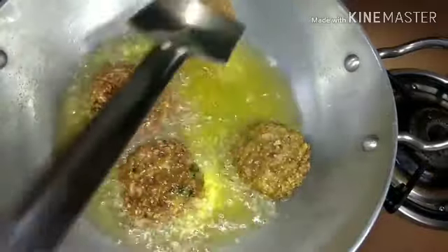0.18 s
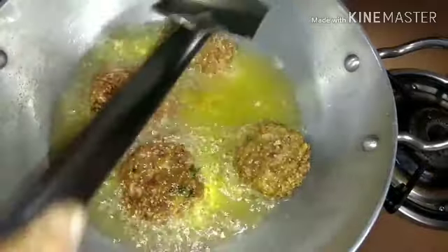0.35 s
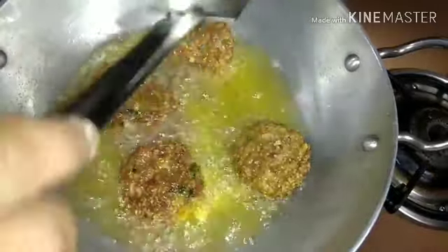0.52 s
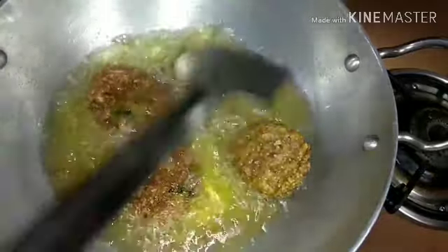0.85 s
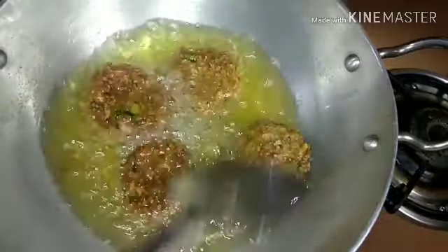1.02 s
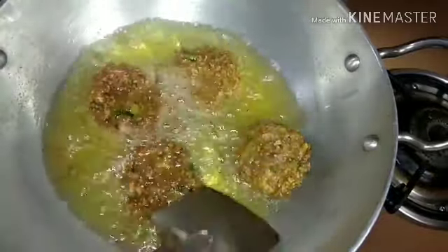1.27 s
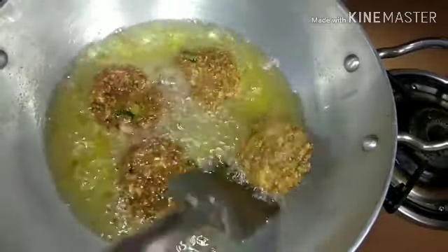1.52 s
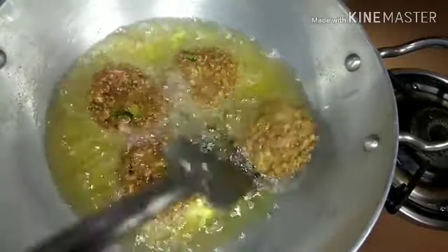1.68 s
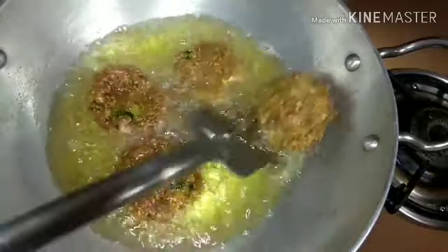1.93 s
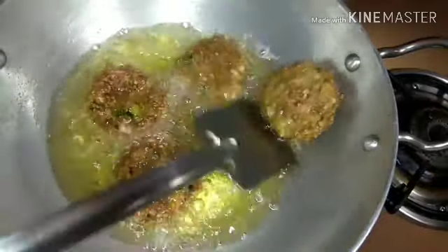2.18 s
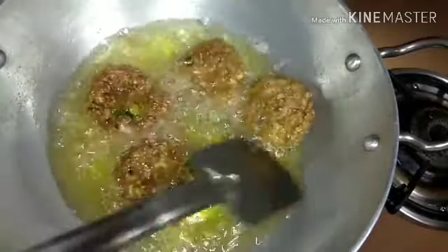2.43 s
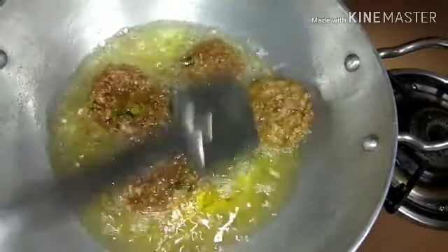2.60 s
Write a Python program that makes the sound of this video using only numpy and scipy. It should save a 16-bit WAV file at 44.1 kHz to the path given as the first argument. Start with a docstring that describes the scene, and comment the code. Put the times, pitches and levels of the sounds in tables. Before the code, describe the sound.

Frying in hot oil: crisp high crackles and tiny snaps scattered over a thin, bright, patchy fizz. A sharp pop stands out near 0.9 seconds. Pops come more steadily after 1, then crowd together from 2 to 2.4, loudest near 2.3. Low bubble plops and spatula drags are barely audible; a faint high metallic ting comes near 2.5. Close phone sound, short pan and kitchen echoes.

```python
"""Cutlets fry in a metal pan of hot oil under a phone. From the start, steam bubbles burst as short pitched
pops over a fizz of countless tiny bubbles, larger bubbles plop softly, and a spatula drags on the pan in
band-passed strokes of hum, with low bumps of the hand. The pops crowd together past two seconds, and near
the end the blade rings once as a decaying sine. Throughout, echoes in pan and kitchen give a short tail,
and a noise suppressor thins the steady fizz into patches."""
import sys
import numpy as np
from scipy import signal
from scipy.fft import rfft, irfft
from scipy.io import wavfile
from scipy.ndimage import uniform_filter1d

SR = 44100
rng = np.random.default_rng(int(sys.argv[2]) if len(sys.argv) > 2 else 0)


def unload_audio(sound):
    """Save the sound as a 16-bit wav file, at the path given as the first command line argument."""
    columns = np.transpose(np.atleast_2d(sound))
    # keep every value between -1 and 1, then stretch to whole-number steps
    steps = np.round(np.clip(columns, -1, 1) * 32767)
    wavfile.write(sys.argv[1], SR, steps.astype(np.int16))


N = 121275  # samples, 2.75 s

# All levels are set ahead of the left-right balance, the echoes, the suppressor and the microphone colour.
# Bursting steam bubbles. Each row: start in seconds, level in dB before the low cut, pitch in Hz,
# length in cycles (played as at least 1), left minus right in dB.
STEAM_POPS = [(0.029, -37, 3400, 11.4, 5.5), (0.0398, -29.5, 5670, 8.3, -5), (0.0703, -16.5, 9600, 2, -2.5),
              (0.0942, -31.5, 9740, 12.7, 22.5), (0.1243, -36, 11700, 28, -8.5),
              (0.2099, -19.5, 7000, 4, -1), (0.2144, -21, 4500, 0.94, 10.5), (0.2161, -24, 4260, 4.9, -4.5),
              (0.3655, -25.5, 6170, 5.1, 0), (.416, -40, 5700, 2.15, -21), (0.47, -27.5, 9300, 1.53, -19),
              (0.5128, -25.5, 4930, 4.2, 3.5), (0.5774, -25, 4540, 4.5, 2), (0.579, -20, 7800, 2.9, 7.5),
              (0.6502, -24, 7500, 11, 5.5), (0.6648, -23.5, 5560, 1.33, -14.5),
              (0.74, -21.5, 5410, 6.7, 9.5), (.7761, -28, 11500, 18, 3), (.848, -15.5, 6640, 4.2, -4),
              (0.8865, -22.5, 10680, 11, 4), (0.9339, -7.5, 9540, 3.25, 1), (0.9662, -34, 8100, 5.5, -7),
              (1.035, -37, 7000, 5.3, -22.5), (1.0765, -18.5, 8640, 4.4, -11.5),
              (1.1431, -25, 6370, 6.7, -8), (1.1628, -18.5, 7230, 2.9, 2), (1.1986, -19, 10280, 8.8, -0.5),
              (1.2221, -15.5, 4970, 6.3, -6.5), (1.2878, -17, 13460, 8, 2.5),
              (1.3234, -21.5, 4660, 3.16, -7), (1.4427, -17, 5200, 1.48, -6),
              (1.4418, -28.5, 10600, 6.4, -19), (1.444, -34.5, 1353, 5.6, 5.5),
              (1.4735, -25.5, 11060, 10, -3), (1.5145, -18, 8550, 2.9, 3.5), (1.5533, -19, 5840, 3.7, -4),
              (1.6118, -19, 5320, 4.6, -6), (1.6496, -30, 8530, 11.4, -8.5), (1.7, -21, 8550, 2.33, -10.5),
              (1.6991, -24, 3600, 0.43, 2), (1.8196, -18.5, 6900, 3.6, 3.5),
              (1.8598, -26.5, 2880, 4.4, 6.5), (1.8821, -22.5, 4970, 2.04, -19),
              (1.8949, -24.5, 2980, 7, 1.5), (1.9082, -21, 5400, 2.12, -16), (1.9413, -26.5, 3770, 1.9, -7),
              (1.9452, -31, 6120, 12, 8), (1.9555, -22, 4640, 5.1, 2), (2.0018, -27.5, 11230, 7.3, -19.5),
              (2.0108, -34.5, 3570, 2.9, 21), (2.0295, -36.5, 8000, 3.1, -36.5),
              (2.0461, -27.5, 6300, 6.5, -13), (2.0722, -29.5, 5400, 8.5, 6), (2.1097, -31, 3540, 5.3, 4),
              (2.147, -22.5, 9770, 13, -14), (2.1518, -25.5, 3430, 3.7, 5.5), (2.16, -15, 10770, 6.5, -6.5),
              (2.1824, -15, 11200, 3.5, -1), (2.1957, -22.5, 11250, 14, -6), (2.2011, -26, 3680, 3.4, -3),
              (2.2224, -28.5, 3220, 2.2, 6), (2.2378, -21, 3440, 2.56, -2.5),
              (2.2432, -12.5, 7900, 5.8, -10), (2.2542, -9, 8800, 5.3, -5.5),
              (2.271, -10.5, 5940, 2.2, 1.5), (2.2936, -4.5, 6800, 1, -0.5), (2.3503, -14, 7560, 1.92, -11),
              (2.4263, -18, 5280, 3.36, -4), (2.4574, -17, 8060, 4.1, -8), (2.5047, -28.5, 4070, 4.7, 9.5),
              (2.5126, -10.5, 5710, 4.55, -5), (2.5596, -20, 7900, 5.3, 8.5),
              (2.6829, -24.5, 11200, 16.4, -7.5)]
# Larger bubbles. Each row: start in seconds, level in dB, pitch in Hz.
BUBBLE_PLOPS = [(0.069, -61, 1210), (0.319, -35.5, 688), (0.605, -49.5, 677), (0.675, -47, 1070),
                (0.747, -41, 820), (2.114, -53, 756), (2.53, -48.5, 620)]
# Swell of the fizz. Each row: time in seconds, level in dB above the split, level in dB below it.
FIZZ_LEVELS = [(0, -46.5, -59), (.2, -50, -63), (.45, -47, -65), (.7, -47.5, -61), (.85, -54, -69),
               (1.25, -45.5, -62.5), (1.4, -50, -56), (1.6, -46.5, -60), (1.78, -51.5, -57.5),
               (1.95, -45, -60.5), (2.25, -44.5, -63), (2.45, -44.5, -58.5), (2.6, -43, -64),
               (2.75, -44.5, -58.5)]
# Relative spectrum of the fizz. Each row: frequency in Hz, density in dB per Hz.
FIZZ_SPECTRUM = [(1000, -66), (1500, -12), (2800, 1), (4700, 5.5), (8400, 11), (12000, -3), (15000, 6)]
# Spatula strokes on the pan. Each row: start in seconds, length in seconds, level in dB,
# centre of the hum in Hz.
SPATULA_STROKES = [(0, 0.17, -67, 1160), (0.207, 0.39, -73.5, 492), (0.591, 0.28, -72, 470),
                   (1.244, 0.28, -56.5, 319), (1.535, 0.25, -62.5, 520), (1.705, 0.054, -52, 286),
                   (1.722, 0.32, -61, 490), (2.362, 0.11, -66, 655), (2.662, 0.084, -67.5, 960),
                   (2.507, 0.13, -71.5, 590)]
# Resonances of the pan bowl. Each row: frequency in Hz, width in Hz.
BOWL_MODES = [(205, 35), (290, 20), (405, 35), (517, 16), (610, 45), (740, 50), (900, 60), (1200, 80)]
# Relative strength of those resonances, in the same order. Each entry: level in dB.
BOWL_MODE_LEVELS = [-15, -2, -9, -4.5, -6.5, -7, -0.5, -3.5]
# Soft bumps of handling. Each row: start in seconds, length in seconds, level in dB.
HAND_BUMPS = [(0.01, 1, -75), (0.731, 0.24, -60.5), (1.129, 0.37, -65.5), (2.393, 0.14, -68)]
# Relative spectrum of the rumble before its high cut. Each row: frequency in Hz, density in dB per Hz.
RUMBLE_SPECTRUM = [(25, -37), (60, 2.5), (85, 2), (130, -8), (200, -3)]
# Decay of the kitchen tail. Each row: frequency in Hz, time to fall 60 dB in seconds.
KITCHEN_DECAY = [(500, 0.22), (2600, 0.75), (7000, 0.42), (14000, 0.43)]
# Microphone colour. Each row: frequency in Hz, gain in dB.
MIC_COLOUR = [(20, -30.5), (200, 5.5), (13000, 5), (14300, -14.5), (15700, -16)]

LAG_S, LAG_SPREAD_S = .00008, .00004  # on average the left port hears later
PLOP_CYCLES = 2.44
FIZZ_PER_S, FIZZ_SPREAD_DB, SPLIT_HZ = 3000, 3.6, 3600
STROKE_OCTAVES = 0.73  # half-width of the stroke's band, where its gain falls to 1/e
TING_S, TING_DB, TING_HZ, TING_T60_S = 2.482, -35, 12455, .3
KITCHEN_DB = -3
WALL_DB, WALL_T60_S = -2, .028  # quick echoes inside the bowl of the pan
EDGE_HZ = 15768  # top of the microphone's band


def amp(db):
    """Turns dB into a linear gain."""
    return 10 ** (np.asarray(db) / 20)


def evened(x):
    """Scales a signal to an RMS of 1."""
    return x / np.sqrt(np.mean(x ** 2) + 1e-20)


def read(points, hz):
    """Reads a frequency table, interpolating along log frequency."""
    f, value = np.transpose(points)
    return np.interp(np.log(hz + 1), np.log(f + 1), value)


def curve(rows, column):
    """Draws a gain envelope through the dB values of one column."""
    rows = np.array(rows)
    return amp(np.interp(np.arange(N) / SR, rows[:, 0], rows[:, column]))


def coloured(x, gain):
    """Filters by a gain given as a function of frequency."""
    spectrum = rfft(x) * gain(np.fft.rfftfreq(x.shape[-1], 1 / SR))
    return irfft(spectrum, x.shape[-1])


def add(mix, s, sound):
    """Lays a sound into the mix at s seconds, cut off at the end of the mix."""
    part = mix[max(round(s * SR), 0):][:len(sound)]
    part += sound[:len(part)]


def hump(length, lean):
    """A smooth swell and fade over length seconds; a lean under 1 peaks early."""
    return np.sin(np.pi * np.linspace(0, 1, round(length * SR)) ** lean) ** 1.46


def bubble(hz, cycles):
    """A bubble rings for a few cycles under a bell of peak 1 that rises faster than it falls."""
    u = np.arange(int(2.5 * cycles / hz * SR) + 8) / SR * hz / cycles
    bell = np.exp(-((u - .5) / np.where(u < .5, .2, .45)) ** 2)
    return bell * np.sin(2 * np.pi * cycles * u)


def pops():
    """Each burst is a pitched bubble, reaching the two ports at slightly different times and pitches."""
    out = np.zeros((2, N))
    variations = rng.standard_normal((len(STEAM_POPS), 2))
    for (s, db, hz, cycles, pan_db), (lag, bend) in zip(STEAM_POPS, variations):
        for side, sign in enumerate((1, -1)):  # left, right
            at = s + sign * (LAG_S + LAG_SPREAD_S * lag) / 2
            gain = amp(db + sign * pan_db / 2)
            pitch = hz * (1 + 0.046 * sign * bend)
            add(out[side], at, gain * bubble(pitch, max(cycles, 1)))
    return coloured(out, lambda hz: 1 / (1 + (1100 / (hz + 1)) ** 6))  # low cut


def plops():
    """Larger bubbles ring lower, each as one short pitched bubble."""
    out = np.zeros(N)
    for s, db, hz in BUBBLE_PLOPS:
        add(out, s, amp(db) * bubble(hz, PLOP_CYCLES))
    return out


def fizz():
    """Countless tiny bubbles of all pitches, a few of them large, scattered left and right."""
    happens = rng.random(N) < FIZZ_PER_S / SR
    size = amp(FIZZ_SPREAD_DB * np.minimum(rng.exponential(1, N), 4)) * happens
    kind = rng.integers(0, 48, N)
    out = np.zeros((2, N))
    for k, hz in enumerate(np.geomspace(1000, 15000, num=48)):
        grain = bubble(hz, 5.82)
        # a band of log-spaced pitches widens with frequency, hence sqrt(hz)
        gain = amp(read(FIZZ_SPECTRUM, hz)) * np.sqrt(hz) / np.linalg.norm(grain)
        out[k % 2] += gain * signal.oaconvolve(size * (kind == k), grain)[:N]
    # each side leaks to the other, 4 samples late
    out = out + 0.22 * np.roll(out[::-1], 4, axis=1)
    low = coloured(out, lambda hz: 1 / (1 + (hz / SPLIT_HZ) ** 8))
    high = out - low
    return curve(FIZZ_LEVELS, 1) * evened(high) + curve(FIZZ_LEVELS, 2) * evened(low)


def pan_hum():
    """Uneven slips of the spatula, noise of wandering level, excite the resonances of the pan bowl."""
    wander = evened(uniform_filter1d(rng.standard_normal(N), 900))
    slips = rng.standard_normal(N) * amp(3 * wander)

    def bowl(hz):
        modes = zip(BOWL_MODES, BOWL_MODE_LEVELS)
        return sum(amp(db) / (1 + (2 * (hz - f) / width) ** 2) for (f, width), db in modes)
    return evened(coloured(slips, bowl))


def strokes():
    """Each drag swells and fades in its own band of the pan hum, over a faint steady hum."""
    hum = pan_hum()
    out = amp(-73.5) * hum
    for s, length, db, centre in SPATULA_STROKES:
        part = hum[round(s * SR):][:round(length * SR)]
        part = coloured(part, lambda f: np.exp(-(np.log2((f + 1) / centre) / STROKE_OCTAVES) ** 2))
        add(out, s, amp(db) * hump(length, lean=0.49)[:len(part)] * evened(part))
    return out


def ting():
    """The spatula blade rings once as a high sine that decays exponentially."""
    out = np.zeros(N)
    t = np.arange(0, .3, 1 / SR)
    ring = amp(TING_DB - 60 * t / TING_T60_S) * np.sin(2 * np.pi * TING_HZ * t)
    add(out, TING_S, ring * np.minimum(t / 0.0055, 1))  # 5.5 ms fade-in
    return out


def hand_bumps():
    """Handling swells a low rumble of filtered noise, over a faint steady rumble."""
    noise = rng.standard_normal(N)
    rumble = evened(coloured(noise, lambda hz: amp(read(RUMBLE_SPECTRUM, hz)) / (1 + (hz / 230) ** 6)))
    out = amp(-74) * rumble
    for s, length, db in HAND_BUMPS:
        add(out, s, amp(db) * hump(length, lean=0.39) * rumble[round(s * SR):][:round(length * SR)])
    return out


def kitchen(x):
    """Dense quick echoes in the pan, and sparse taps dying band by band; three tails take turns."""
    out, turn = np.zeros((2, N)), np.arange(N) / SR * 23
    for k in range(3):
        # one tap of random sign in every 20 samples
        taps = np.zeros((2, SR // 2))
        at = np.arange(100, SR // 2 - 20, 20) + rng.integers(0, 20, (2, (SR // 2 - 101) // 20))
        np.put_along_axis(taps, at, rng.choice([-1., 1.], at.shape), 1)
        hz, t, z = signal.stft(taps, SR, nperseg=256)
        decay = amp(-60 * t / read(KITCHEN_DECAY, hz)[:, None])
        tail = signal.istft(z * decay, SR, nperseg=256)[1]
        tail *= amp(KITCHEN_DB) / np.linalg.norm(tail[0])
        walls = rng.standard_normal((2, 2000)) * amp(-60 * np.arange(2000) / SR / WALL_T60_S)
        tail[:, 35:2035] += amp(WALL_DB) * walls / np.linalg.norm(walls[0])
        # the squared shares of the three always sum to 1
        share = np.sqrt(2 / 3) * np.cos(turn + k * np.pi / 3)
        out += signal.fftconvolve(x * share, tail, axes=1)[:, :N]
    return out


def scene():
    """Mixes bubbles, fizz and spatula with their echoes."""
    balance = amp([[-1.5], [1.5]])  # left, right
    bursts = pops() + balance * plops()
    steady = balance * fizz()
    tool = balance * (strokes() + ting() + hand_bumps())
    return bursts + steady + tool + kitchen(bursts + steady + amp(-2.5) * tool)


def record(dry):
    """The suppressor lowers bands near their usual quiet level; then microphone colour and band limit."""
    z = signal.stft(dry, nperseg=1024, noverlap=768)[2]
    power = (abs(z) ** 2).mean(0)
    power = uniform_filter1d(power, size=5, axis=0)  # smooth across bands
    power = uniform_filter1d(power, size=5, axis=1)  # smooth across time
    quiet = np.percentile(power, 25, axis=1, keepdims=True)
    gain = np.maximum(1 - 1.1 * quiet / (power + 1e-20), amp(-18))  # cuts by 18 dB at most
    gain *= amp(read(MIC_COLOUR, np.fft.rfftfreq(1024, 1 / SR)))[:, None]
    clean = signal.istft(z * gain, nperseg=1024, noverlap=768)[1][:, :N]
    band_limit = signal.firwin(511, EDGE_HZ, window=("kaiser", 9), fs=SR)
    return signal.oaconvolve(clean, band_limit[None], "same")


dry = scene()
out = record(dry)
unload_audio(out)
```